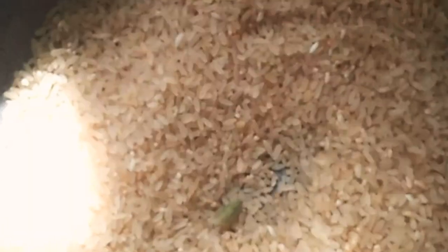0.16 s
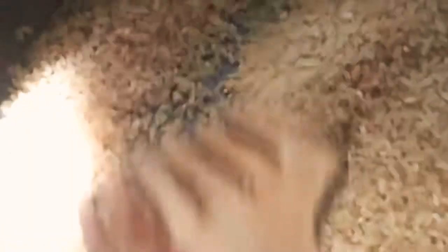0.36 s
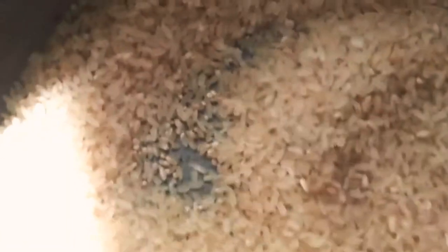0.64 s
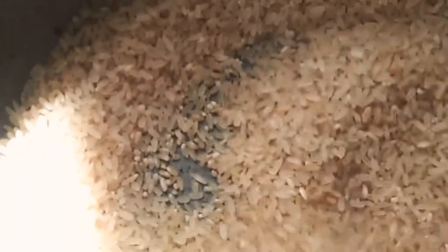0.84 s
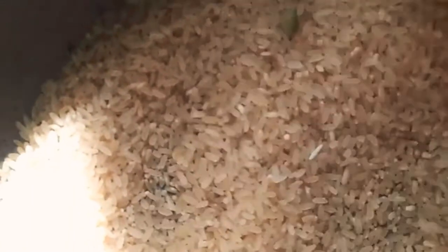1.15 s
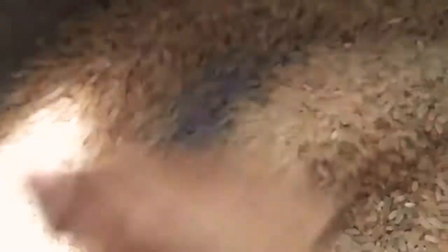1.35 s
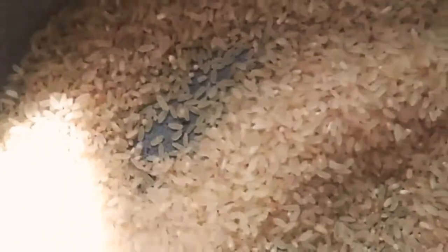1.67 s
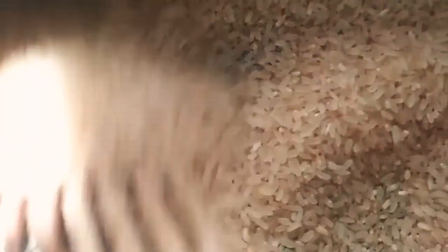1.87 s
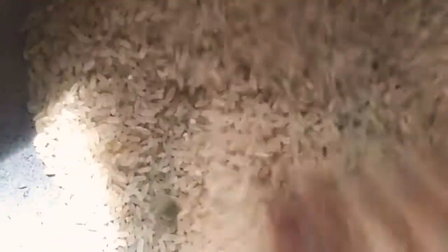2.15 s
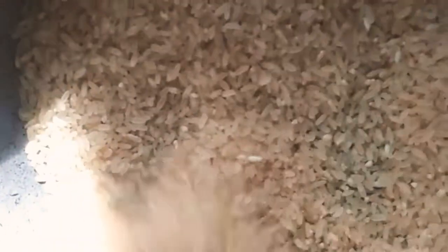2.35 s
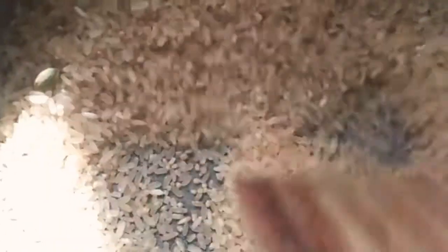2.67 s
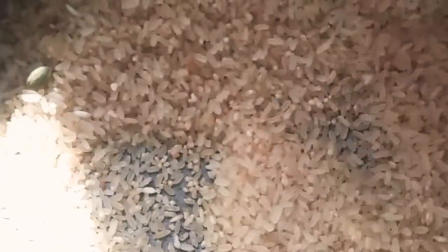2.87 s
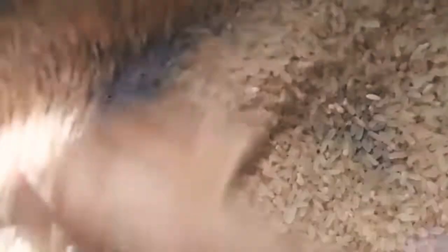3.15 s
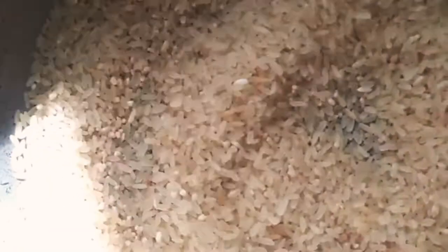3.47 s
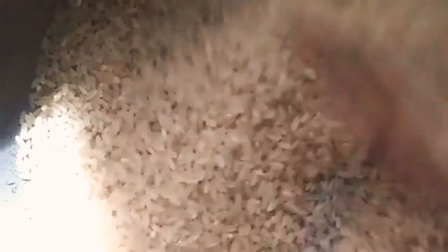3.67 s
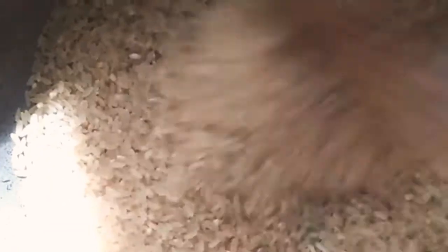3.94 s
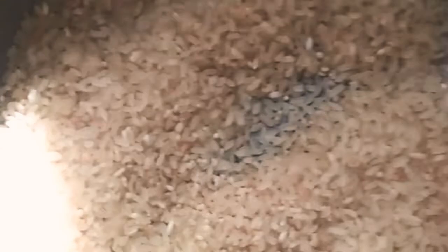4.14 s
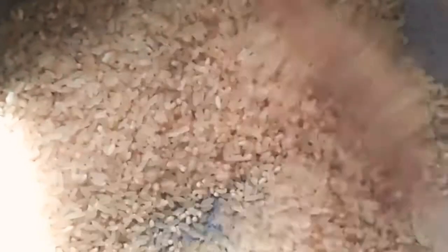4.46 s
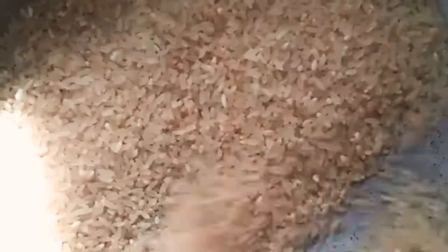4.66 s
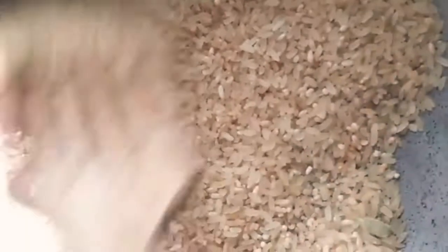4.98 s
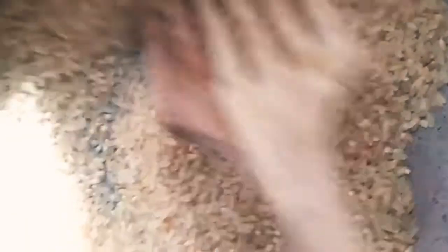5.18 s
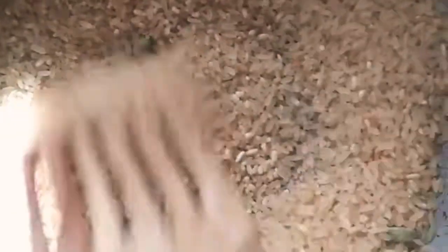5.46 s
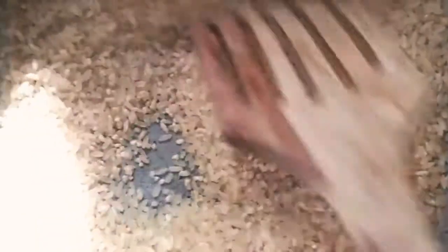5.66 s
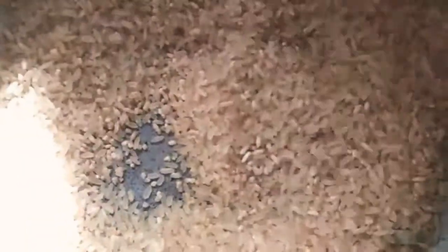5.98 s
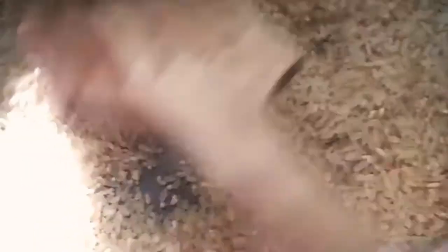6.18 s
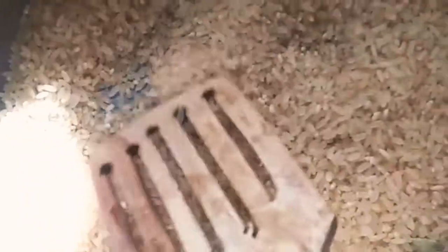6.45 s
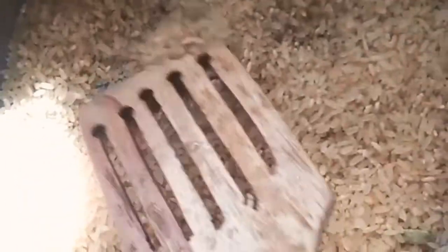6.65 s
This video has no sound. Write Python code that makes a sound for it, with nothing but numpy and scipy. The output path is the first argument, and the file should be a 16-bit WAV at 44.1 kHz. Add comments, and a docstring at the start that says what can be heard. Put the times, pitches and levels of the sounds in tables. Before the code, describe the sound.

Close, crisp swishes of dry rice being scraped around a metal pan with a wooden spatula, punctuated by ringing taps, over a very faint low rumble.

```python
"""After a moment of silence a wooden spatula is already stirring dry rice in a metal pan, close by, in mono.
As it stirs, dense random ticks give bright grains, grains on metal, a scraping edge and a wooden drag.
Knocks fall amid the stirring, the hardest near the end: a noise crack, ringing pan modes, sprays of rice, a room tail.
Beneath it all the pan shudders as a dull noise rumble, and a far engine of low puffs and hum throbs at times."""
import sys
import numpy as np
from scipy import signal
from scipy.fft import rfft, irfft, next_fast_len
from scipy.io import wavfile
from scipy.ndimage import uniform_filter1d, map_coordinates

SR = 44100
rng = np.random.default_rng(int(sys.argv[2]) if len(sys.argv) > 2 else 0)


def store_wav(level_fs):
    """Save 16-bit WAV to argv[1]."""
    pcm = np.round(np.clip(np.atleast_2d(level_fs), -1, 1) * 32767)
    wavfile.write(sys.argv[1], SR, pcm.T.astype(np.int16))


N = 300486

# Stirring, one table for each stretch between sudden onsets:
# (time [s], rice flow level [dB], spatula pressure level [dB])
STIR_STRETCHES = [
    [(0.64, -43.5, -52.5), (0.65, -32.5, -43.5), (0.706, -43.5, -58), (0.716, -38, -49),
     (0.826, -38, -51.5), (0.956, -37.5, -59), (0.98, -43, -62)],
    [(0.989, -34.5, -59), (1.027, -34.5, -59.5), (1.103, -49, -69), (1.111, -38, -66), (1.128, -54, -56)],
    [(1.15, -44, -46), (1.264, -37.5, -52.5), (1.286, -40, -40.5), (1.334, -33.5, -49.5),
     (1.478, -28.5, -54.5), (1.586, -54, -71), (1.6, -57, -65)],
    [(1.63, -42, -46.5), (1.658, -43.5, -49.5), (1.822, -34.5, -46.5), (1.922, -30.5, -54.5),
     (1.942, -31.5, -45), (2.108, -34.5, -55.5), (2.18, -37.5, -56.5)],
    [(2.185, -34.5, -53), (2.203, -26, -52), (2.375, -35.5, -46), (2.381, -34.5, -48.5),
     (2.473, -33.5, -47.5), (2.511, -41, -55), (2.623, -37.5, -61.5), (2.709, -53, -71.5),
     (2.819, -94, -84), (2.87, -93, -69)],
    [(2.882, -70, -52), (2.938, -38, -50), (3.124, -34.5, -51.5), (3.174, -28, -50), (3.186, -29.5, -58),
     (3.202, -30.5, -51.5), (3.37, -43.5, -69.5), (3.39, -41.5, -65)],
    [(3.397, -34, -52), (3.409, -30.5, -47), (3.467, -36, -55.5), (3.533, -33.5, -49), (3.623, -37, -56),
     (3.65, -43.5, -60)],
    [(3.66, -27, -47), (3.676, -19, -40), (3.71, -30, -55), (3.774, -39.5, -65), (3.81, -40.5, -66)],
    [(3.835, -34, -44.5), (3.901, -37.5, -54), (3.999, -34.5, -50.5), (4.025, -39.5, -55),
     (4.035, -36, -59.5)],
    [(4.046, -23.5, -45.5), (4.058, -20, -42), (4.142, -34.5, -57.5), (4.284, -39.5, -56.5),
     (4.3, -35.5, -45.5), (4.364, -38.5, -51), (4.43, -53, -61), (4.445, -44.5, -60)],
    [(4.459, -28.5, -53), (4.523, -48, -67), (4.535, -39, -61)],
    [(4.555, -30, -50), (4.569, -36, -44), (4.711, -36, -54), (4.717, -34, -56.5), (4.809, -44.5, -67),
     (4.82, -42, -61)],
    [(4.83, -44, -50), (4.884, -42, -59), (4.928, -41, -52.5), (5.004, -36, -58), (5.094, -34, -48),
     (5.132, -37.5, -57), (5.174, -38, -58), (5.218, -43, -63), (5.405, -40, -59.5)],
    [(5.47, -35, -53), (5.502, -44, -55.5), (5.534, -39, -57), (5.578, -34.5, -54), (5.598, -40, -42.5),
     (5.732, -46, -69), (5.846, -95, -81), (5.92, -90, -75)],
    [(5.95, -44.5, -48), (5.98, -48.5, -45), (6.0, -45.5, -52)],
    [(6.005, -39, -49), (6.011, -42, -47.5), (6.097, -40.5, -56.5), (6.127, -34, -51), (6.159, -38, -58.5),
     (6.227, -32.5, -55), (6.403, -51, -68), (6.531, -58, -72), (6.565, -69, -83), (6.585, -70, -68)],
]
# Spatula knocks: (time [s], crack level [dB], ping level [dB], clack level [dB], clack centre [Hz],
# thud level [dB], thud centre [Hz], freedom of the pan to ring [0-1])
SPATULA_KNOCKS = [(0.6373, -20.5, -50, -62, 1670, -50, 522, .4),
                  (0.6482, -10.5, -28, -30.5, 1730, -39, 468, 0.26),
                  (0.8351, -23.5, -29.5, -40.5, 1020, -45, 566, 0.37),
                  (0.9866, -22.5, -43.5, -56, 1990, -59, 463, 0.3),
                  (1.1111, -19, -47.5, -56, 2080, -50, 552, 0.1),
                  (1.137, -21, -45.5, -31, 1200, -35.5, 468, 0.2),
                  (1.2185, -32.5, -46, -51, 1360, -33.5, 470, .15),
                  (1.2851, -20, -34.5, -62, 1000, -30, 482, 0.1),
                  (1.6119, -10.5, -29, -28.5, 1260, -33.5, 580, 0.18),
                  (1.793, -28, -33.5, -33.5, 1170, -36, 473, .3),
                  (1.9374, -19.5, -37, -57, 1040, -34, 291, 0.3),
                  (2.3023, -17.5, -45, -39, 1300, -41, 587, 0.1),
                  (2.364, -21.5, -29, -43, 1570, -45, 476, 0.3),
                  (2.4377, -25.5, -28.5, -29, 1640, -47, 323, .25),
                  (2.8798, -53, -70, -61, 990, -30.5, 322, 0.3),
                  (3.4042, -21, -28, -32.5, 1360, -42, 727, .3),
                  (3.5209, -19.5, -38, -53, 1190, -43, 490, .28),
                  (3.8234, -15, -35, -51, 2180, -37.5, 468, 0.26),
                  (4.3012, -29, -38.5, -53, 1030, -35.5, 470, 0.26),
                  (4.3494, -29, -25, -35, 1600, -61, 789, 0.4),
                  (4.4598, -17, -39, -38.5, 1040, -50, 301, .3),
                  (4.5458, -17.5, -39, -48, 1450, -41, 471, 0.27),
                  (4.828, -34, -54, -47, 1040, -49, 592, .4),
                  (5.4163, -25.5, -32, -38, 1630, -49, 738, 0.51),
                  (5.4473, -25.5, -35.5, -32.5, 1530, -53, 713, 0.36),
                  (5.4523, -17, -21, -21, 1544, -51, 713, 0.28),
                  (5.6005, -31, -50, -31.5, 990, -38, 720, 0.23),
                  (5.928, -63, -68, -58, 1100, -35.5, 470, 0.05),
                  (5.9347, -19, -46, -31.5, 1155, -36, 560, 0.47),
                  (6.0196, -20.5, -45, -36, 1160, -44, 331, 0.4),
                  (6.1206, -15, -35, -47, 2200, -53, 886, 0.2),
                  (6.5911, -56, -68, -52, 1100, -34.5, 430, .3),
                  (6.5981, -6.5, -19, -23, 1310, -28.5, 732, .5)]
# Modes of the pan: (frequency [Hz], relative level [dB], t60 of the free pan [s])
PAN_MODES = [(323, -6, .5), (470, -3, .4), (593, -5, .5), (660, -10, .3), (732, -4, .3), (850, -10, .3),
             (950, -10, .3), (1170, -6, .5), (1260, -9, .3), (1338, -8, .35), (1371, -6, .4),
             (1530, -3, .3), (1600, -5, .3), (1696, -5, .45), (1800, -7, .35), (1950, -9, .25),
             (2934, -4, .3), (3445, -2, .28), (4400, -9, .2), (4764, -6, .26), (5082, -12, .3),
             (5356, -7, .3), (5696, -7, .3), (6089, -8, .2), (6433, -13, .3), (6896, -13, .3),
             (7730, -14, .25), (7908, -16, .25), (8260, -14, .12), (8576, -17, .2), (9006, -21, .15)]

# Colour of grain on grain: (frequency [Hz], relative level [dB])
RICE_COLOUR = [(2650, -36.5), (4500, -10.5), (5030, -16), (5420, -23), (6320, -4.5), (8550, 3.5),
               (12500, -4.5), (13900, -9.5), (16000, -18.5)]
# Colour of grains on metal: (frequency [Hz], relative level [dB])
METAL_COLOUR = [(1000, -37.5), (1700, -12.5), (2850, -13), (5020, -7), (5430, -0.5), (6220, -8.5),
                (7000, -8), (9100, -17), (15400, -120)]
# Colour of the spatula edge's hiss: (frequency [Hz], relative level [dB])
EDGE_COLOUR = [(700, -53), (1000, -0.5), (1500, 1.5), (1900, -14.5), (2400, 2), (3200, -41)]
# Colour of the dragging wood: (frequency [Hz], relative level [dB])
DRAG_COLOUR = [(100, -59), (170, -10), (325, -5), (371, -7.5), (462, -1.5), (512, -3.5), (1100, -6.5),
               (1430, -21.5), (2420, -120)]
# Colour of the knock's crack: (frequency [Hz], relative level [dB])
CRACK_COLOUR = [(900, -21.5), (1500, -22.5), (3000, -19.5), (4600, -18), (5700, -16.5), (6800, -7.5),
                (8200, 1), (9800, -8.5), (13000, -11.5), (16000, -20)]
# Colour of the shuddering pan: (frequency [Hz], relative level [dB])
RUMBLE_COLOUR = [(15, -6.5), (40, 0), (90, 2.5), (200, -15), (300, -46.5)]

# Flurry after a knock, for grains, metal, edge, drag: level against crack, ping, clack, thud [dB]
FLURRY_DB = [-18.5, -2.5, -5.5, -10]
# Decay of that flurry, in the same order: t60 [s]
FLURRY_T60_S = [0.057, 0.063, 0.056, 0.097]
# Rumble of the pan at the usual rice flow: (time [s], level [dB])
SHUDDER_LEVEL = [(0.64, -94), (0.79, -72), (2.32, -67.5), (2.58, -68), (3.54, -73), (3.96, -69),
                 (5.91, -73), (6.09, -66), (6.81, -70)]
# Throb of the far engine: (time [s], level [dB])
ENGINE_THROB = [(0.64, -73), (1.21, -76), (1.27, -50), (1.57, -72), (1.6, -58), (2.15, -70), (2.43, -59),
                (2.51, -68.5), (3.16, -66), (3.3, -78), (3.7, -57), (3.75, -68.5), (4.04, -62), (4.87, -73),
                (5.35, -56.5), (5.54, -75), (5.59, -62), (5.86, -75), (6.1, -59), (6.55, -76), (6.59, -57),
                (6.81, -61)]

METAL_DB, METAL_FROM_PRESSURE = -3, 0.31  # grains on metal follow the flow, and a little the pressure
EDGE_DB, EDGE_FROM_PRESSURE = -14, 0.51  # the edge hiss follows flow and pressure alike
PING_HZ = 5000
CRACK_T60_S, SNAP_T60_S = 0.039, 0.0093  # body of the crack, and its sharper front
ROOM_DB, ROOM_T60_S = -6.5, .46
SHUDDER_GROWS, USUAL_FLOW_DB = 0.4, -42.5  # dB per dB of moving rice
PUFFS_PER_S = 19  # on average
START_S, FADE_IN_S, TOP_HZ = .636, 0.0071, 15750


def stirring():
    """Grain on grain is bright; grain on metal and the scraping spatula ring the damped pan."""
    flow_db, press_db = flow_and_pressure()
    metal_db = METAL_DB + flow_db + METAL_FROM_PRESSURE * (press_db - flow_db)
    edge_db = EDGE_DB + flow_db + EDGE_FROM_PRESSURE * (press_db - flow_db)
    stir_gains = amp([flow_db, metal_db, edge_db, press_db])
    rice_gain, metal_gain, edge_gain, drag_gain = np.hypot(stir_gains, shaken())

    rice_ticks = patter(5000, spread_db=3, blur=0.7)
    metal_ticks = patter(3500, spread_db=3.0, blur=0.58)
    edge_ticks = patter(2000, spread_db=4, blur=0.43)
    drag_ticks = patter(1000, spread_db=3.0, blur=0.57)
    rice = coloured(through_pan(rice_ticks, damping=1.7, ring_db=6.0), RICE_COLOUR)
    metal = coloured(through_pan(metal_ticks, damping=1.1, ring_db=0.5), METAL_COLOUR)
    edge = coloured(through_pan(edge_ticks, damping=7.8, ring_db=13.5), EDGE_COLOUR)
    drag = coloured(through_pan(drag_ticks, damping=2.4, ring_db=8.0), DRAG_COLOUR)

    # grains and metal share one unsteady flow; each layer also wavers by itself
    flow = wobble(40)
    rice_waver = amp(1.0 * flow + 0.75 * wobble(80))
    metal_waver = amp(0.72 * flow + 1.1 * wobble(30) + 2.3 * wobble(12))
    edge_waver = amp(0.58 * wobble(32) + 3.1 * wobble(15))
    drag_waver = amp(2.5 * wobble(35))
    return (patchy(rice, depth_db=0.94) * rice_gain * rice_waver
            + patchy(metal, depth_db=1.5) * metal_gain * metal_waver
            + edge * edge_gain * edge_waver
            + drag * drag_gain * drag_waver)


def flow_and_pressure():
    """Rice flow and spatula pressure in dB, stretch after stretch; each new stretch sets in at once."""
    t = np.arange(N) / SR
    levels = np.array(curves(STIR_STRETCHES[0]))
    for rows in STIR_STRETCHES[1:]:
        levels = np.where(t >= rows[0][0], curves(rows), levels)
    return levels


def shaken():
    """The short flurry that every knock adds to the four stirring layers, as gains."""
    gains = np.zeros((4, N + SR))
    t = np.arange(SR // 4) / SR
    t60 = np.maximum(FLURRY_T60_S, .01)[:, None]
    dying = amp(-60 * t / t60) * (1 - np.exp(-t / 0.001))
    for s, crack_db, ping_db, clack_db, _, thud_db, *_ in SPATULA_KNOCKS:
        level_db = np.add([crack_db, ping_db, clack_db, thud_db], FLURRY_DB)
        gains[:, round(s * SR):][:, :len(t)] += amp(level_db)[:, None] * dying
    return gains[:, :N]


def patter(rate, spread_db, blur):
    """Random ticks (rate a second), mostly small, some large, blurred by noise for ticks too dense to tell apart."""
    size_db = spread_db * np.minimum(rng.exponential(size=N), 4.5)
    struck = rng.random(N) < rate / SR
    ticks = struck * amp(size_db) * rng.choice([-1, 1], N)
    blur = np.clip(blur, 0, 1)  # share of the power
    return np.sqrt(1 - blur) * unit(ticks) + np.sqrt(blur) * rng.standard_normal(N)


def through_pan(x, damping, ring_db):
    """x plus the pan modes it excites; rice lying in the pan widens them."""
    def response(f):
        out = np.ones(len(f), complex)
        for k, (hz, db, t60) in enumerate(PAN_MODES):
            width = damping * np.log(1000) / (np.pi * t60)
            mode = 1j * f * width / (hz * hz - f * f + 1j * f * width)
            out += (-1) ** k * amp(db + ring_db) * mode
        return out
    return filtered(x, response)


def patchy(x, depth_db):
    """Heaps of rice slide by turns: random gain in patches of time and pitch."""
    z = signal.stft(x, nperseg=256)[2]
    field = rng.standard_normal(z.shape)
    for axis in (0, 1):
        field = uniform_filter1d(field, 8, axis)
    gain = amp(depth_db * field / field.std())
    return unit(signal.istft(z * gain, nperseg=256)[1][:N])


def knocks():
    """Each knock is a crack of wood on metal and a new mix of ringing pan modes."""
    out = np.zeros(N + SR)
    t = np.arange(int(.4 * SR)) / SR
    for s, crack_db, *pan_blow in SPATULA_KNOCKS:
        out[round(s * SR):][:len(t)] += pan_ring(t, crack_db, *pan_blow) + wood_crack(t, crack_db)
    return out[:N]


def pan_ring(t, crack_db, ping_db, clack_db, clack_hz, thud_db, thud_hz, free):
    """Decaying sine modes: low thud, middle clack and high ping; a less free pan dies away sooner."""
    hz, level_db, t60 = (c[:, None] for c in np.transpose(PAN_MODES))
    # the spot struck favours the modes near one pitch; a hard blow wakes them all
    choosy = np.clip(-crack_db / 16, .35, 1.6)
    thud = thud_db + 3.5 - 16 * choosy * np.abs(np.log2(hz / thud_hz))
    clack = clack_db + 0.19 - 36 * choosy * np.abs(np.log2(hz / clack_hz))
    ping = ping_db - 6.0 - 12 * choosy * np.abs(np.log2(hz / PING_HZ))
    drive_db = np.where(hz < 1000, thud, np.where(hz < 2200, clack, ping))
    chance_db, chance_phase = rng.standard_normal((2, len(PAN_MODES), 1))
    # grains resting on the metal jostle the phase of every mode, the high ones most
    steps = rng.standard_normal((len(PAN_MODES), len(t)))
    jostle = 0.033 * (hz / 1000) ** 0.75 * np.cumsum(steps, axis=1)
    decay = amp(drive_db + level_db + chance_db - 60 * t / (t60 * max(free, .03)))
    modes = decay * np.sin(2 * np.pi * hz * t + jostle + chance_phase)
    return np.sum(modes, axis=0) * (1 - np.exp(-t / 0.00026))


def wood_crack(t, crack_db):
    """Wood on metal: a coloured noise burst with a sharp front and a slower body."""
    burst = amp(-60 * t / CRACK_T60_S) + 3.66 * amp(-60 * t / SNAP_T60_S)
    noise = coloured(rng.standard_normal(len(t)), CRACK_COLOUR)
    return noise * amp(crack_db - 14.5) * burst * (1 - np.exp(-t / 0.00054))


def kitchen(x, t60):
    """The room's answer: a dying noise tail, duller than the blow."""
    t = np.arange(SR // 2) / SR
    colour = [(200, -8.5), (1000, -2.5), (6000, -6), (16000, -12.5)]  # (frequency [Hz], relative level [dB])
    tail = coloured(rng.standard_normal(len(t)), colour) * amp(-60 * t / t60)
    delayed = np.pad(x, (200, 0))  # samples before the answer
    return signal.fftconvolve(delayed, tail / np.linalg.norm(tail))[:N]


def shudder():
    """The pan shudders on the stove: a dull, lumpy rumble that swells with the moving rice."""
    moving = np.hypot(amp(flow_and_pressure()[0]), shaken()[0]) / amp(USUAL_FLOW_DB)
    lumps = amp(curves(SHUDDER_LEVEL)[0] + 3.5 * wobble(9.2))
    rumble = coloured(rng.standard_normal(N), RUMBLE_COLOUR)
    return lumps * moving ** SHUDDER_GROWS * rumble


def engine():
    """A far engine: uneven puffs and noise ring a low resonance beside a hum near 120 Hz."""
    throb_db, = curves(ENGINE_THROB)
    turns = np.cumsum(PUFFS_PER_S * (1 + .08 * wobble(5))) / SR
    puffs = np.diff(np.floor(turns), prepend=0) * amp(0.83 * rng.standard_normal(N))

    def pipe(f):
        return (1j * f * 45 / (118 ** 2 - f * f + 1j * f * 45)) ** 2  # 118 Hz, 45 Hz wide, passed twice

    puffing = unit(filtered(puffs, pipe))
    breath = unit(filtered(rng.standard_normal(N), pipe))
    hum = np.sqrt(2) * np.sin(2 * np.pi * np.cumsum(121 + 6 * wobble(2.5)) / SR)
    return amp(throb_db) * (0.92 * puffing + 0.29 * breath + 0.27 * hum)


def amp(db):
    """Decibels to a linear gain."""
    return 10 ** (np.asarray(db) / 20)


def unit(x):
    """x scaled to rms 1."""
    return x / np.sqrt(np.mean(x ** 2) + 1e-20)


def curves(rows):
    """One value per sample for each column after the time."""
    s, *cols = np.transpose(rows)
    return [np.interp(np.arange(N) / SR, s, c) for c in cols]


def wobble(rate):
    """A smooth random curve, rate knots a second."""
    knots = rng.standard_normal(int(N * rate / SR) + 4)
    return map_coordinates(knots, [np.arange(N) * rate / SR])


def filtered(x, response):
    """x filtered by a complex response of frequency."""
    m = next_fast_len(len(x) + SR // 2)
    return irfft(rfft(x, m) * response(np.fft.rfftfreq(m, 1 / SR)), m)[:len(x)]


def coloured(x, spectrum):
    """x shaped by (frequency [Hz], relative level [dB]) points on a log axis, rms 1."""
    f, db = np.transpose(spectrum)
    return unit(filtered(x, lambda hz: amp(np.interp(np.log(hz + 1), np.log(f), db))))


def scene():
    """Stirring, knocks with the room's answer, the shudder and the engine, in mono."""
    blows = knocks()
    room = amp(ROOM_DB) * kitchen(blows, ROOM_T60_S)
    mono = stirring() + blows + room + shudder() + engine()
    return np.array([mono, mono])


def record(dry):
    """Silent until the sound cuts in; nothing above the band limit."""
    on = np.clip((np.arange(N) / SR - START_S) / FADE_IN_S, 0, 1)
    return np.array([on * filtered(channel, lambda hz: hz < TOP_HZ) for channel in dry])


dry = scene()
out = record(dry)
store_wav(out)
```